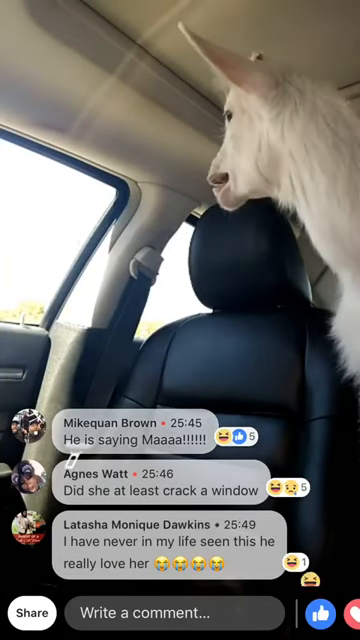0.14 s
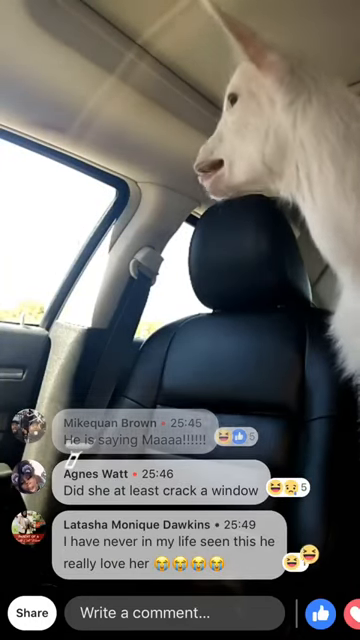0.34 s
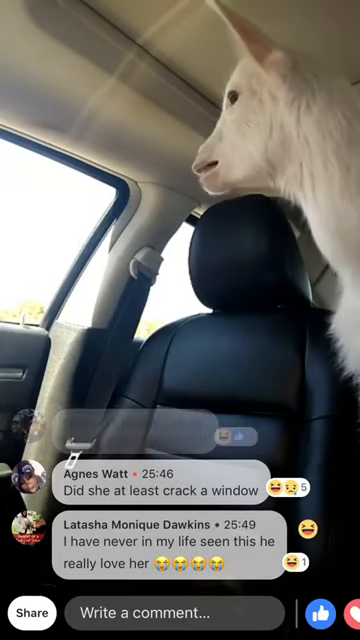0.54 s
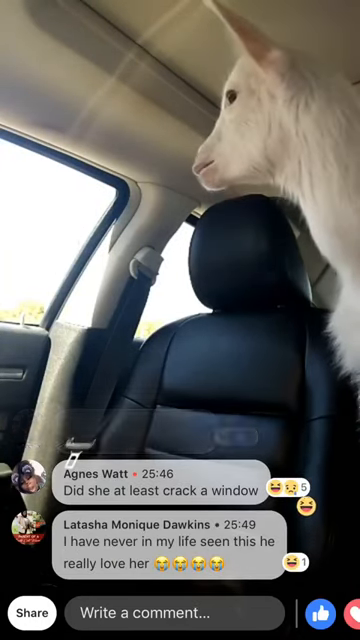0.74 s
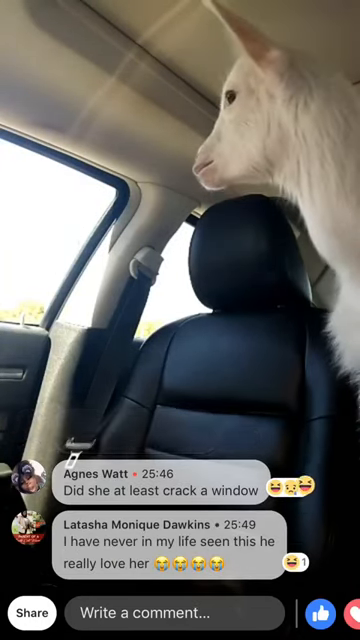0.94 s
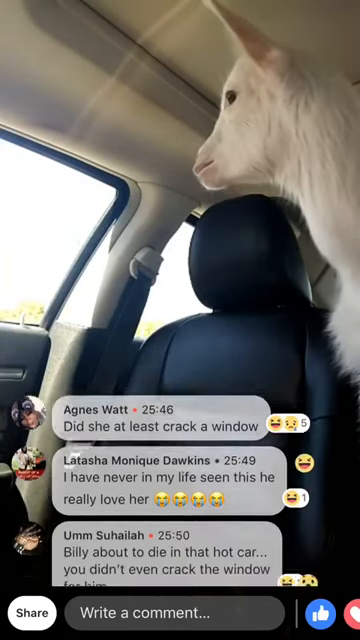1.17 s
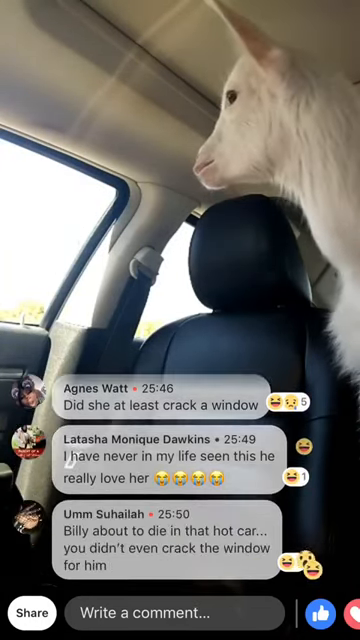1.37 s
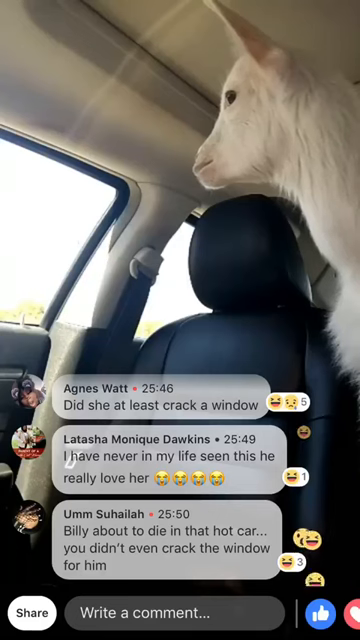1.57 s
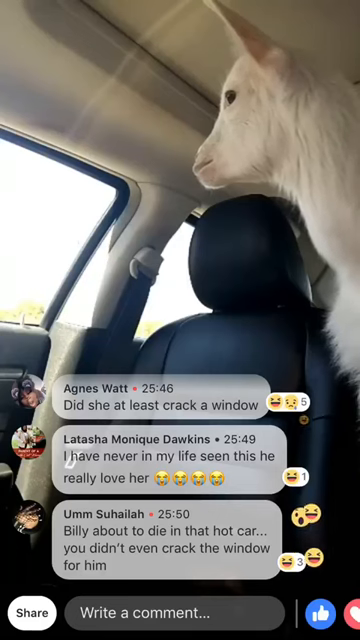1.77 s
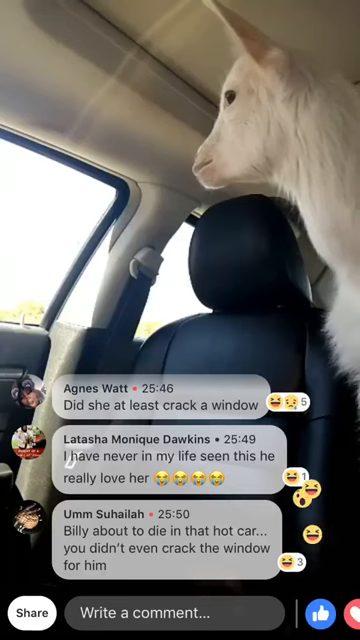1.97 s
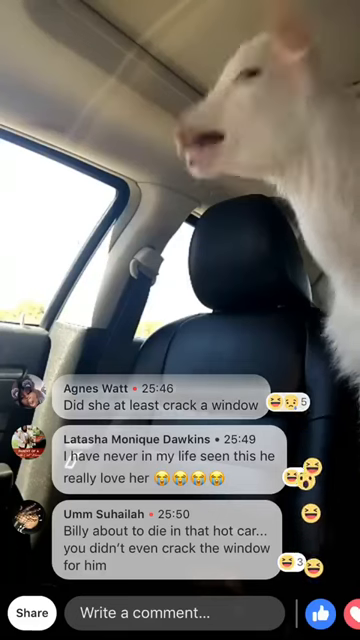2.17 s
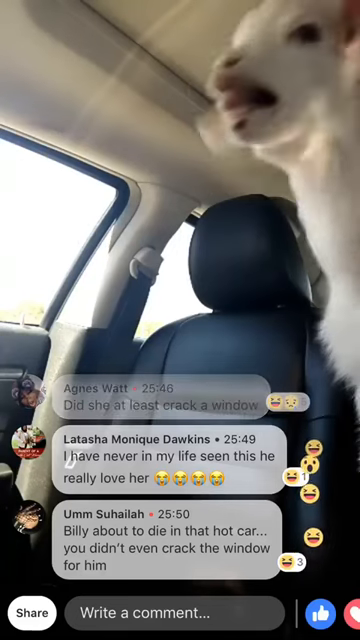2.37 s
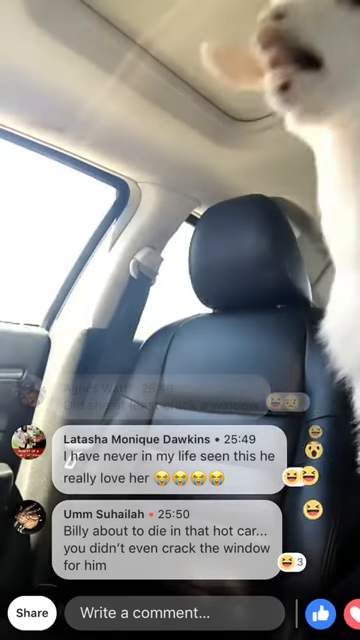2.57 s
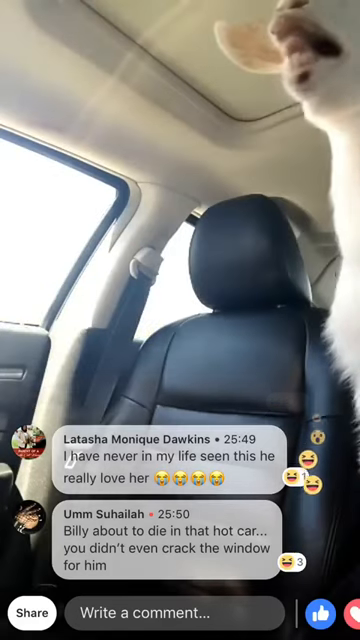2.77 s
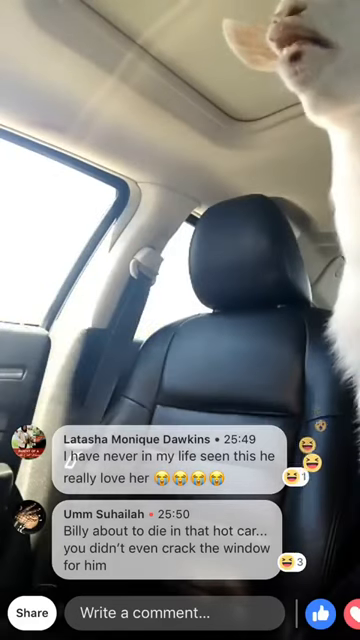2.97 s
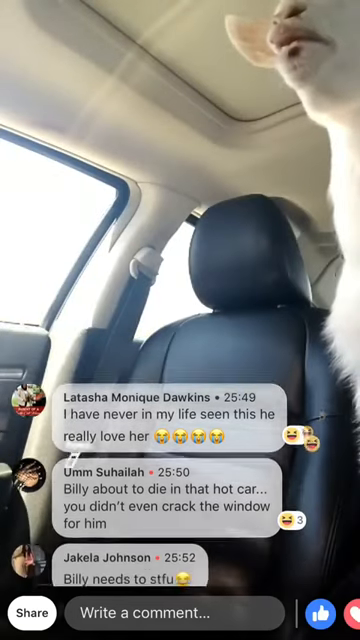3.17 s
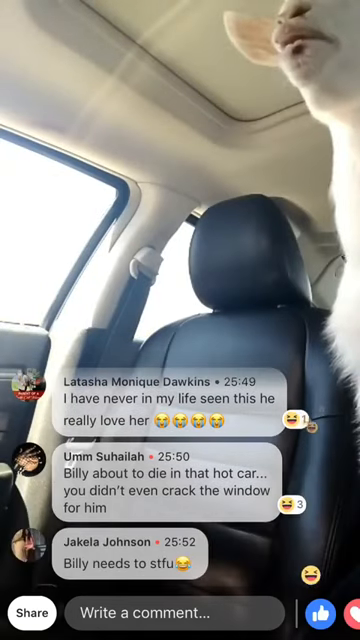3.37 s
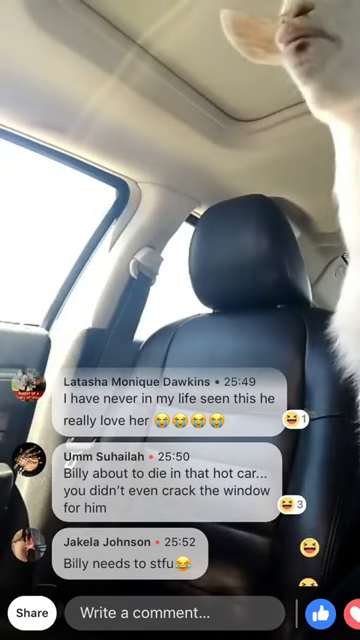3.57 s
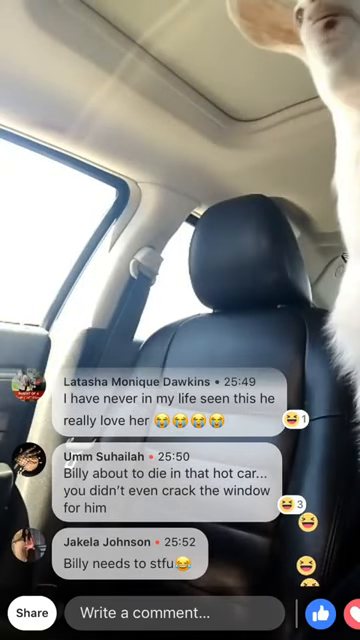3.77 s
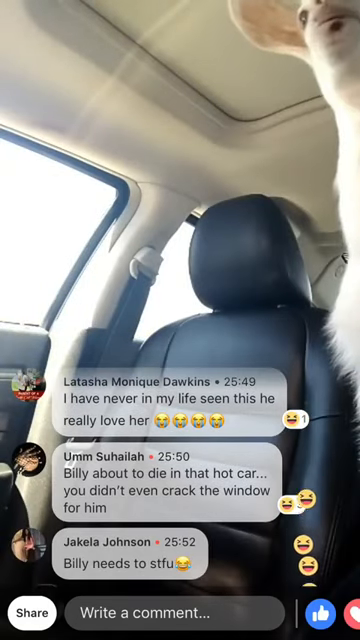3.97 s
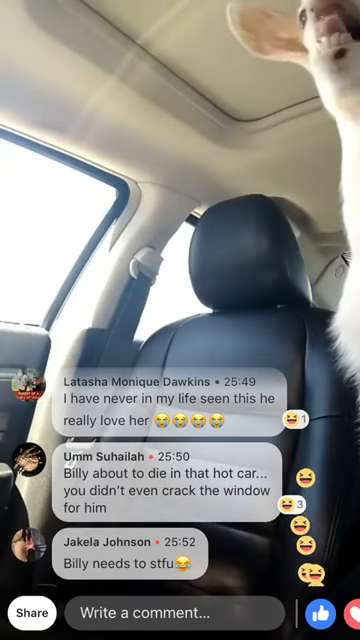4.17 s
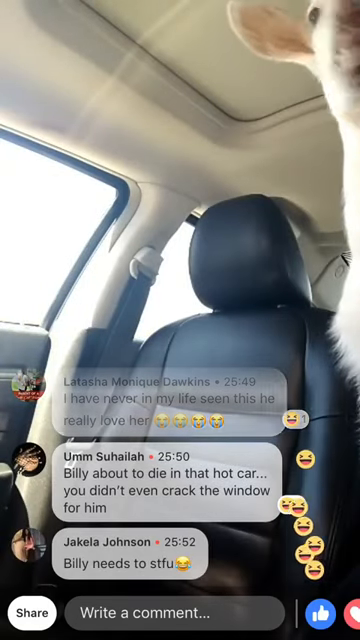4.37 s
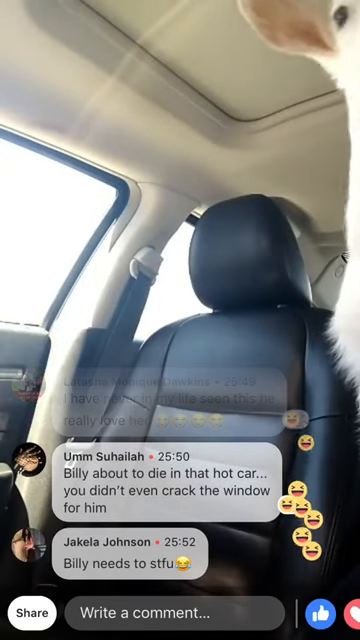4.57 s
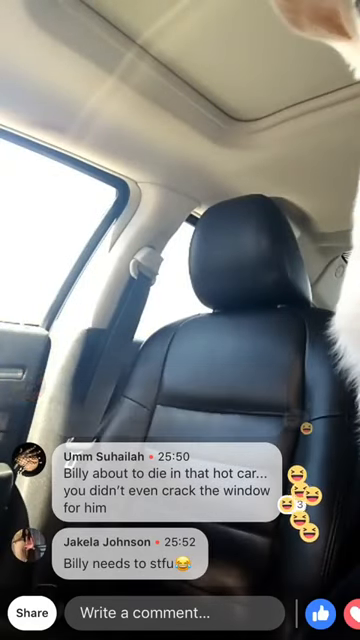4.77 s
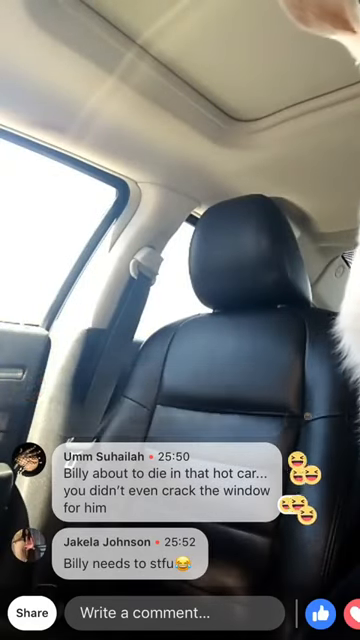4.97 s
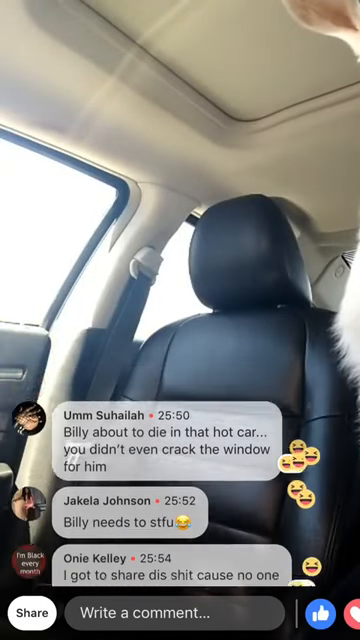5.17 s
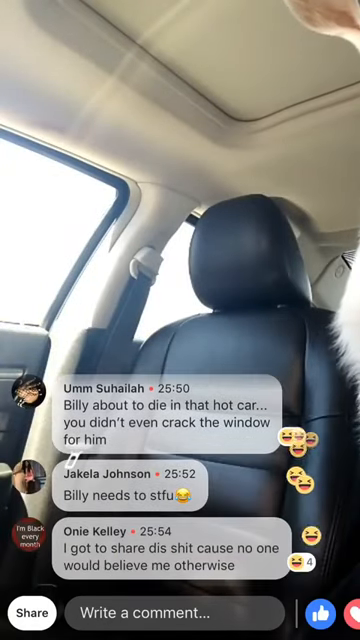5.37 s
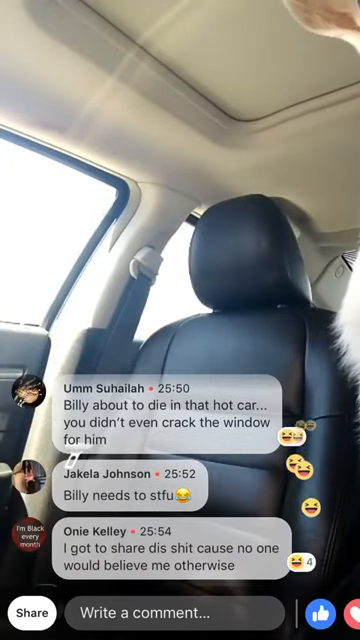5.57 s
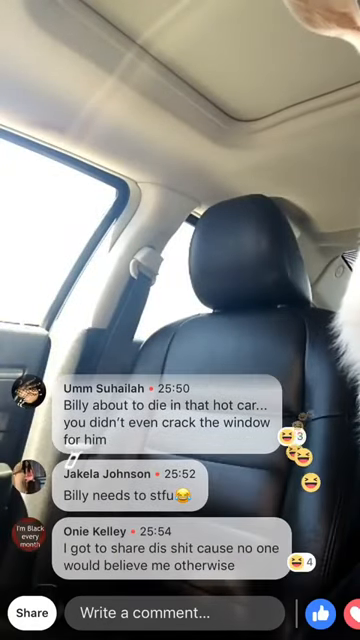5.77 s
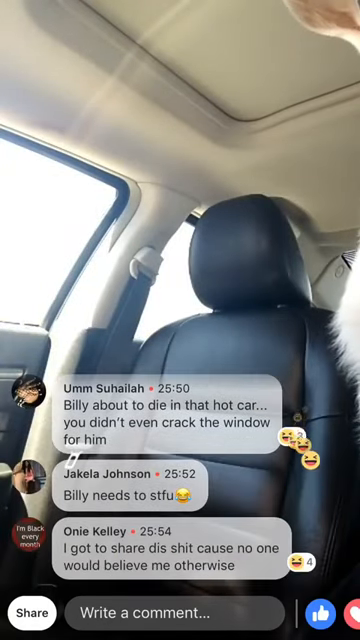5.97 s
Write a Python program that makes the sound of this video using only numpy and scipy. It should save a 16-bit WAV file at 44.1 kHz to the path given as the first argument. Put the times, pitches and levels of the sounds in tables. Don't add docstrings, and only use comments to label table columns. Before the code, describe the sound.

Inside a closed car, a young goat is caught mid-bleat with a short, sinking cry. Near-quiet follows, with faint rumble and hiss flickering in and out. Two long bleats come later, each swooping up from a brief closed-mouth hum, then quavering hoarsely downward. A light hoof knock on leather follows. Close phone microphone, dry sound with very short cabin echoes.

```python
import sys
import numpy as np
from scipy import signal
from scipy.fft import rfft, irfft
from scipy.io import wavfile
from scipy.ndimage import uniform_filter1d, minimum_filter1d

SR = 44100
rng = np.random.default_rng(int(sys.argv[2]) if len(sys.argv) > 2 else 0)


def int16_out(signal):
    q = np.round(np.clip(np.atleast_2d(signal).T, -1, 1) * 32767)
    wavfile.write(sys.argv[1], SR, q.astype(np.int16))


def magnitude_from_level(level_db):
    exponent = np.asarray(level_db, float) / 20
    return 10 ** exponent


N = 266364

# (opens [s], shuts [s], rumble level [dB])
GATE_OPENINGS = [(0.5, 0.566, -51.5), (0.661, 0.673, -50.5), (0.899, 0.926, -54), (1.002, 1.097, -51),
                 (1.089, 1.165, -47.5), (1.171, 1.254, -48), (1.27, 1.33, -47.5), (1.437, 1.485, -49),
                 (1.725, 1.738, -48.5), (1.88, 1.906, -49), (2.951, 3.022, -51), (3.048, 3.162, -49),
                 (3.209, 3.314, -48), (3.345, 3.442, -49.5), (3.424, 3.544, -45.5), (3.546, 3.656, -49.5),
                 (3.721, 3.746, -52), (3.761, 3.769, -47), (3.796, 3.866, -45.5), (3.869, 3.93, -49),
                 (4.995, 5.063, -48.5), (5.064, 5.133, -47), (5.291, 5.36, -47.5), (5.427, 5.462, -46.5),
                 (5.527, 5.605, -44), (5.601, 5.673, -47.5), (5.673, 5.746, -45.5), (5.766, 5.843, -48.5),
                 (5.834, 5.898, -46.5), (6.004, 6.019, -45)]
# (frequency [Hz], level [dB per Hz])
RUMBLE_COLOUR = [(15, -49.5), (25, -17.5), (43, -8), (64, -3.5), (151, -22), (199, -25), (257, -25),
                 (310, -27.5), (743, -42), (1500, -47.5), (1950, -77.5), (3300, -120)]
# (frequency [Hz], level [dB per Hz])
HISS_COLOUR = [(500, -2), (1500, -8), (3500, -8.5), (5000, -9), (7000, -10), (8900, -3.5), (9500, -20)]
# (time [s], peak level [dB])
HOOF_TAPS = [
    (5.1794, -60),
    (5.2794, -65),
    (5.3097, -38.5),
    (5.4094, -63),
]
# (frequency [Hz], width [Hz], level [dB])
LEATHER_MODES = [(2280, 460, -2), (2635, 370, -5), (3720, 550, -6), (6320, 1300, -15)]
# (time [s], pitch [Hz], effort [dB], roughness [0-1], mouth resonance [Hz])
OPEN_CRIES = [
    [(0, 621, -13.5, .11, 5200), (.19, 617.3, -15, 0.2, 5300), (.29, 590, -12.5, 0.2, 5600),
     (.33, 582.5, -17, .24, 5600), (.385, 531, -13, .22, 5400), (.415, 518.4, -15.5, 0.3, 5494)],
    [(2.0, 604.7, -13.5, .18, 4953), (2.06, 644.7, -16, 0.02, 5000), (2.16, 639, -14.5, .07, 4705),
     (2.44, 606.4, -14, .11, 4900), (2.66, 588.5, -15, .26, 5300), (2.73, 536, -14, 0.2, 4864),
     (2.795, 546.1, -19.5, 0.4, 4585), (2.85, 499.6, -13.5, .12, 4550), (2.872, 503.1, -18, 0.2, 4455)],
    [(4.03, 626, -9, .2, 4630), (4.11, 648.5, -12.5, .05, 4587), (4.3, 632.7, -15.5, .06, 4590),
     (4.5, 612, -12.5, .1, 4460), (4.7, 593.1, -12.5, .22, 4407), (4.8, 570.7, -9.5, .2, 4930),
     (4.835, 570.8, -18, 0.3, 4730), (4.87, 504, -12, 0.3, 4630), (4.905, 522.8, -13.5, 0.3, 4816)],
]
# (start [s], pitch [Hz])
LEAD_HUMS = [
    None,
    (1.916, 380),
    (3.952, 410),
]
# (first partial [dB], second partial [dB], top partials [dB])
HEAD_FACING = [
    (8.5, -1, -5.5),
    (-2.5, 2, -4),
    (4, 1.5, -.5),
]
# (top [s], lift [Hz], catch depth [dB])
QUAVER_JERKS = [(.091, 16, 1.5), (.154, 14, 5), (.232, 30, 13.5), (.316, 25, 18.5), (2.0, 18, 1.5),
                (2.098, 2.6, 8.5), (2.336, 9.8, 0.5), (2.441, 12, 3), (2.52, 24, 12.5), (2.592, 34, 10.5),
                (2.672, 18, 7.5), (2.808, 6.6, 15), (2.887, 45, 2), (4.03, 25, 1.5), (4.095, 15, 2),
                (4.465, 7.3, 9.5), (4.592, 8, 1), (4.644, 22, 6.5), (4.719, 11, 5), (4.759, 9, 10.5),
                (4.828, 10, 6)]
# (frequency [Hz], level [dB])
THROAT_COLOUR = [(1000, -14), (1550, -13.5), (1900, -17), (2500, -9), (2850, -18.5), (3150, -12.5),
                 (3700, -5.5), (4500, -11), (5600, -6), (6400, -16.5), (7200, -13.5), (7900, -23.5),
                 (8800, -6), (9700, -8.5)]
# (pitch [Hz], level [dB])
CHEST_LEVEL = [(500, -32.5), (545, -41), (590, -50.5), (620, -53), (660, -43)]
# (frequency [Hz], level [dB])
BREATH_COLOUR = [(60, -37.5), (150, -5.5), (300, -8.5), (750, -2.5), (1000, -0.5), (1600, 4), (2000, -28.5)]

CUTOFF_HZ = 10100
HUM_DB, RELEASE_KNEE_DB = -34, -34


def rms_one(x):
    return x / np.sqrt(np.mean(x ** 2) + 1e-20)


def in_time(tables):
    s, *columns = np.concatenate(tables).T
    return [np.interp(np.arange(N) / SR, s, c) for c in columns]


def at_hz(points, hz):
    point_hz, level_db = np.array(points).T
    return np.interp(np.log(np.maximum(hz, 1)), np.log(point_hz), level_db)


def drift(rate_hz):
    r = np.exp(-2 * np.pi * rate_hz / SR)
    noise = rng.standard_normal(N + SR // 2)
    return rms_one(signal.lfilter([1], [1, -2 * r, r * r], noise)[SR // 2:])


def coloured(spectrum):
    hz = np.fft.rfftfreq(N, 1 / SR)
    return rms_one(irfft(rfft(rng.standard_normal(N)) * magnitude_from_level(at_hz(spectrum, hz)), N))


def road():
    t = np.arange(N) / SR
    shut_db, hiss_base_db, hiss_follows = -66.5, -80.5, 0.75
    level_db = shut_db + 2.8 * drift(8)
    for opens, shuts, rumble_db in GATE_OPENINGS:
        level_db[(t >= opens) & (t < shuts)] = rumble_db
    cries = whole_cries()
    ducking = []
    for rows in cries:
        start, end = rows[[0, -1], 0]
        ducking.append([(start, -52.5), (start + 0.2, -59), (end - 0.15, -59), (end, -43)])
    ducked_db = 4 * drift(5) + in_time(ducking)[0]
    level_db = uniform_filter1d(np.where(sounding(), ducked_db, level_db), size=SR // 80)
    rumble = coloured(RUMBLE_COLOUR)
    swell = np.sqrt(uniform_filter1d(rumble ** 2, size=SR // 12))
    rumble = rumble / swell ** .8
    hiss_db = hiss_base_db + hiss_follows * (level_db - shut_db)
    for rows in cries:
        since = t - rows[-1][0]
        hiss_db += 13.5 * np.exp(-np.abs(since) / 0.094) * (since > 0)
    hiss = coloured([(100, -29)] + HISS_COLOUR + [(10500, -61.0)])
    return magnitude_from_level(level_db) * rumble + magnitude_from_level(hiss_db) * hiss


def taps():
    t, scuff = np.arange(N) / SR, np.zeros(N)
    for s, peak_db in HOOF_TAPS:
        scuff += magnitude_from_level(peak_db + 2.5 - 60 * np.abs(t - s) / 0.054) * (t >= s)
    scuff = scuff * rng.standard_normal(N) + 1e-18
    out = 0
    for hz, width_hz, level_db in LEATHER_MODES:
        out = out + magnitude_from_level(level_db) * signal.lfilter(*signal.iirpeak(hz, hz / width_hz, fs=SR), scuff)
    return out


def cabin(x):
    t60_s, echo_db = .075, -5
    t = np.arange(int(.3 * SR)) / SR
    tail = rng.standard_normal(len(t)) * magnitude_from_level(-60 * t / t60_s) * (t > .0015)
    return x + magnitude_from_level(echo_db) * signal.fftconvolve(x, tail / np.linalg.norm(tail))[:N]


def whole_cries():
    attack_s, hum_rough, silent_db = 0.028, 0.34, -67
    lead_s, swoop_s, reach, swoop_db, swoop_rough = .05, .026, .92, -30, 0.59
    opening_s = .014
    release_s, knee_s, rise_hz, release_rough = .1, .062, 44.97, .55
    out = []
    for rows, hum, facing in zip(OPEN_CRIES, LEAD_HUMS, HEAD_FACING):
        opens, high, _, _, mouth = rows[0]
        ends, low, _, _, last_mouth = rows[-1]
        lead = []
        if hum is not None:
            starts, hum_hz = hum
            lead = [
                (starts, hum_hz, silent_db, hum_rough, mouth, 1),
                (starts + attack_s, hum_hz, HUM_DB, hum_rough, mouth, 1),
                (opens - lead_s, hum_hz, HUM_DB + 1.0, hum_rough, mouth, 1),
                (opens - lead_s + swoop_s, reach * high, swoop_db, swoop_rough, mouth, 1),
                (opens - opening_s, (1 + reach) / 2 * high, swoop_db + 3.0, swoop_rough, mouth, 1)]
        cry = [(*row, 0) for row in rows]
        tail = [(ends + knee_s, low + rise_hz / 2, RELEASE_KNEE_DB, release_rough, last_mouth, 0),
                (ends + release_s, low + rise_hz, silent_db, release_rough, last_mouth, 0)]
        out.append(np.array([(*row, *facing) for row in lead + cry + tail]))
    return out


def sounding():
    t = np.arange(N) / SR
    return sum((t >= rows[0][0]) & (t < rows[-1][0]) for rows in whole_cries())


def quaver(pitch):
    t = np.arange(N) / SR
    jerk_s, sag_s, catch_s = 0.021, .04, 0.014
    catch_db = 0
    for s, lift_hz, depth_db in QUAVER_JERKS:
        jerk = np.interp(t, [s - jerk_s, s, s + sag_s], [0, 1, 0])
        pitch = pitch + lift_hz * np.sin(np.pi / 2 * jerk) ** 2
        catch_db = catch_db + depth_db * np.interp(t, [s - jerk_s - catch_s, s - jerk_s, s], [0, 1, 0])
    return pitch, catch_db


def low_partials(pitch, upper_db, shut, first_lift_db, second_lift_db, catch_db):
    t = np.arange(N) / SR
    open_db = at_hz(CHEST_LEVEL, pitch) + first_lift_db * np.interp(pitch, [540, 585], [0, 1])
    open_db += 1.2 * np.minimum(upper_db + 25, 0)
    nose_db = -26.5 - 0.05 * (pitch - 400) + .65 * np.minimum(upper_db - HUM_DB, 0)
    first_db = shut * nose_db + (1 - shut) * open_db - 0.31 * catch_db
    lingering_db = np.maximum(upper_db, np.interp(t - 0.023, t, upper_db))
    second_db = -26 + second_lift_db + 0.62 * (lingering_db - upper_db.max()) - catch_db
    second_db += 0.0572 * np.maximum(580 - pitch, 0) * (1 - shut)
    second_db += 3.3 * np.minimum(upper_db - RELEASE_KNEE_DB - 4.0, 0) * (1 - shut)
    return first_db, second_db


def upper_partials(pitch, phase, rough, mouth_hz, shut, top_db):
    mouth_width_hz, shut_db_per_octave = 180, -6.5
    mouth_db = 14 - 25.5 * rough
    top_db = top_db + 20.5 * np.minimum(rough, .25) * (1 - shut)
    upper, power = np.zeros(N), 1e-12
    flicker = [0.44 * drift(16) + 5.2 * rough * drift(120) for _ in range(11)]
    start = rng.uniform(0, 2 * np.pi, 25)
    for k in range(3, 25):
        hz = k * pitch
        ring_db = mouth_db * np.exp(-.5 * ((hz - mouth_hz) / mouth_width_hz) ** 2)
        ring_db += top_db * np.clip(hz / 6670 - 1, 0, .15) / 0.12
        ring_db += shut * shut_db_per_octave * np.log2(k)
        gain = magnitude_from_level(at_hz(THROAT_COLOUR, hz) + ring_db + 2.9 * flicker[k % 11]) * (hz < CUTOFF_HZ)
        upper += gain * np.sin(k * phase + start[k])
        power = power + gain ** 2 / 2
    return upper / np.sqrt(power) * (1 + .05 * np.cos(phase / 2))


def throat_air(phase):
    dip_hz, dip_width_hz = 2150, 500
    bright = [(hz, db + 10 * (hz > 6000)) for hz, db in THROAT_COLOUR]
    air = coloured([(700, -39.5)] + bright + [(10500, -69.5)]) * (1 + 0.55 * np.cos(phase))
    air = signal.lfilter(*signal.iirnotch(dip_hz, dip_hz / dip_width_hz, fs=SR), air)
    return air * magnitude_from_level(3.5 * drift(15))


def bleat():
    pitch, upper_db, rough, mouth_hz, shut, *facing, top_db = in_time(whole_cries())
    pitch, catch_db = quaver(pitch)
    rough = np.clip(rough + .003 * catch_db, 0, 1)
    first_db, second_db = low_partials(pitch, upper_db, shut, *facing, catch_db)
    pitch = pitch * (1 + 0.0039 * drift(40) + 0.056 * rough ** 1.3 * drift(170))
    phase = 2 * np.pi * np.cumsum(pitch) / SR
    upper = upper_partials(pitch, phase, rough, mouth_hz, shut, top_db)
    air_share = np.clip(.025 + .8 * rough ** 1.8, 0, 1)
    voice = magnitude_from_level(upper_db) * (np.sqrt(1 - air_share ** 2) * upper + air_share * throat_air(phase))
    voice += np.sqrt(2) * magnitude_from_level(first_db + 3.3 * drift(18)) * np.sin(phase)
    voice += np.sqrt(2) * magnitude_from_level(second_db + 2.5 * drift(40)) * np.sin(2 * phase + 1)
    voice += magnitude_from_level(upper_db - 35) * coloured(BREATH_COLOUR)
    return voice * uniform_filter1d(sounding() * 1., size=SR // 150)


def scene():
    notch_hz, notch_width_hz = 2850, 300
    near = cabin(bleat() + taps())
    near = signal.lfilter(*signal.iirnotch(notch_hz, notch_hz / notch_width_hz, fs=SR), near)
    return (near + road())[None, :]


def limited(x):
    ceiling_db, release_db_per_s = -4.5, 304.5
    slope = release_db_per_s * np.arange(N) / SR
    over_db = np.maximum(20 * np.log10(np.abs(x[0]) + 1e-9) - ceiling_db, 0)
    held_db = np.maximum.accumulate(over_db + slope) - slope
    return x * magnitude_from_level(-.7 * uniform_filter1d(held_db, size=SR // 400))


def thinned(x):
    mask_db, spread_db, top_mask_db = 21, 5, 21
    hz, _, frames = signal.stft(x[0], SR, nperseg=2048, noverlap=1536)
    width = 8
    bands = frames[:-1].reshape(-1, width, frames.shape[1])
    band_db = 10 * np.log10(np.mean(np.abs(bands) ** 2, axis=1) + 1e-20)
    centre_hz = hz[width // 2::width][:len(band_db), None]
    neighbours_db = -minimum_filter1d(-band_db, size=7, axis=0)
    luck_db = spread_db * uniform_filter1d(rng.standard_normal(band_db.shape), size=9, axis=1) * 3
    floor_db = neighbours_db - mask_db - 10 * (centre_hz < 1750) + luck_db
    masked = (band_db < floor_db) & (centre_hz > 650)
    body_db = band_db[8:48].max(axis=0)
    top_floor_db = body_db - top_mask_db + 14 * (centre_hz > 9200) + luck_db
    masked |= (band_db < top_floor_db) & (centre_hz > 8400)
    frames[:-1] = (bands * np.where(masked, .01, 1)[:, None, :]).reshape(-1, frames.shape[1])
    return signal.istft(frames, SR, nperseg=2048, noverlap=1536)[1][None, :N]


def roll_off(x):
    return signal.sosfilt(signal.butter(12, 9790, fs=SR, output="sos"), x)


def record(dry):
    low_pass = signal.cheby2(12, 70, CUTOFF_HZ, fs=SR, output="sos")
    mix = signal.sosfilt(low_pass, thinned(limited(dry)))
    return roll_off(mix)


dry = scene()
out = record(dry)
int16_out(out)
```